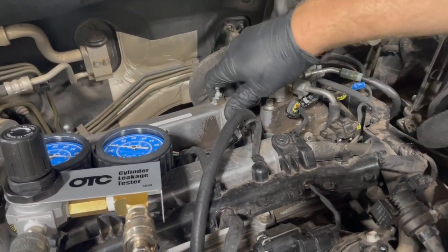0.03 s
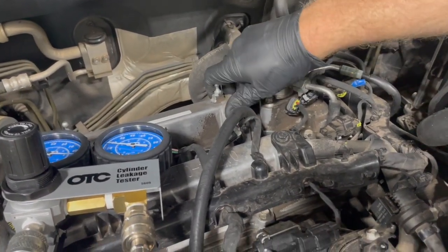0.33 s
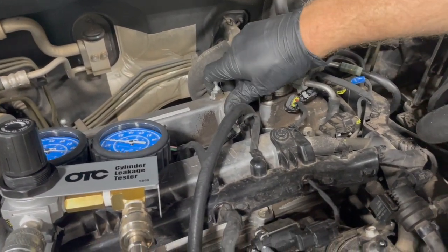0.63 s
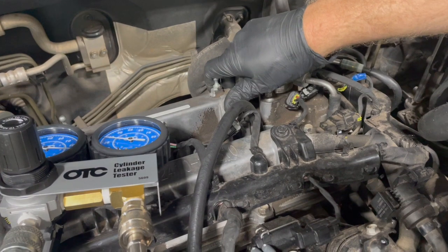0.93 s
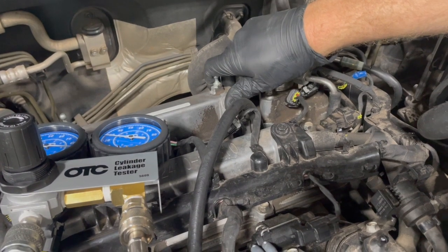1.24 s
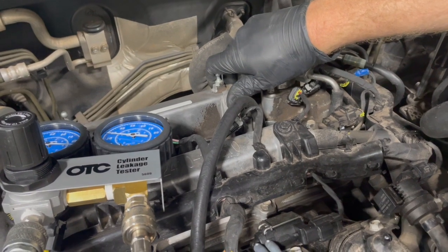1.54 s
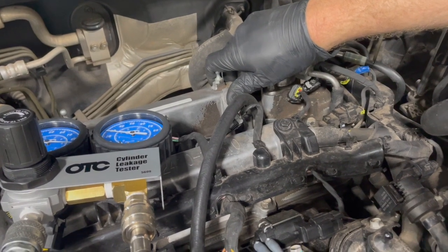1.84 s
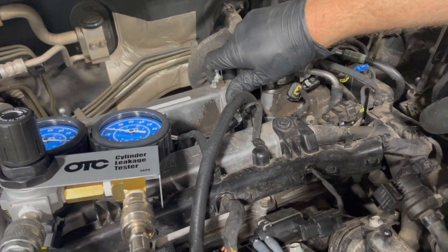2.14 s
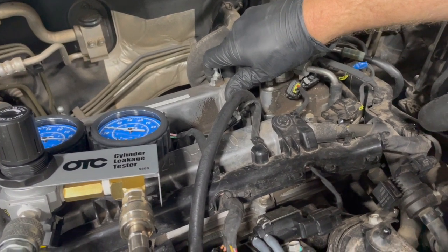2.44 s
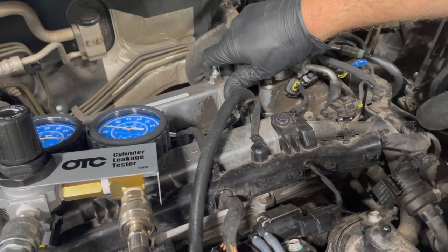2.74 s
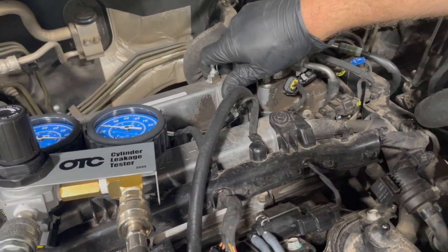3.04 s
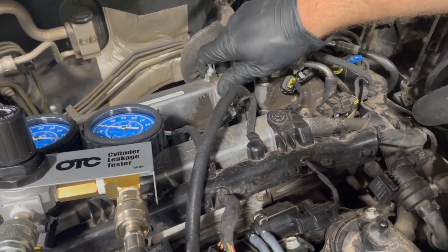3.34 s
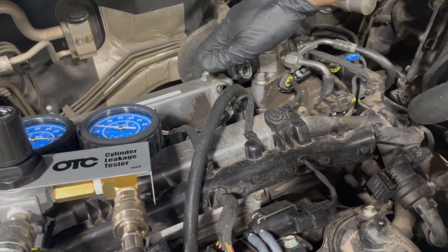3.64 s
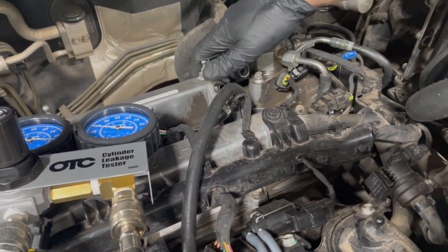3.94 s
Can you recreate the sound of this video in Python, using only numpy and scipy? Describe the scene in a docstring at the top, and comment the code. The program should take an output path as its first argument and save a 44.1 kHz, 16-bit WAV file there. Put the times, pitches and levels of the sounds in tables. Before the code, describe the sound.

Compressed air hisses thinly, then bursts out loudly as a hose is uncoupled.

```python
"""A thin, steady hiss of compressed air leaks from a tester on a car engine, over a garage's rumble and hum.
A gloved hand rubs softly as it takes hold, and late in the scene it uncouples the hose: the seal cracks,
the trapped air bursts out, rings the cavities of the engine bay and dies away in the room.
The loose hose knocks dully, and air keeps venting from the open fitting as the pressure sinks.
The air is shaped stereo noise; the knocks are damped sines that sag in pitch."""
import sys
import numpy as np
from scipy import signal
from scipy.fft import rfft, irfft
from scipy.io import wavfile

SR = 44100
rng = np.random.default_rng(int(sys.argv[2]) if len(sys.argv) > 2 else 0)


def generate_wav(sig):
    """Save sig (samples, or channels by samples) to the path in sys.argv[1] as 16-bit PCM at SR."""
    pcm = np.round(np.clip(np.atleast_2d(sig).T, -1, 1) * 32767).astype(np.int16)
    wavfile.write(sys.argv[1], SR, pcm)


N = 176400
T, HZ = np.arange(N) / SR, np.fft.rfftfreq(N, 1 / SR)
RELEASE_S = 3.354  # the hose comes off

# Colour of the escaping trapped air. Each row: frequency in Hz, relative level in dB.
BURST_SPECTRUM = [(520, -16), (690, -9.5), (950, -17.5), (1030, -9), (1380, -8), (1640, -1), (1810, -7),
                  (2670, -6.5), (3360, 2.4), (3960, -4.5), (4220, -6), (4740, -8.5), (5430, -6),
                  (5770, -3.5), (5940, -3), (6370, -12.5), (7150, -1), (7410, -21), (8700, -6.5),
                  (13610, -15.5), (14470, -17), (15590, -28)]


def amp(db):
    """Decibels to gain."""
    return 10 ** (np.asarray(db) / 20)


def unit(x):
    """Scales to rms 1."""
    return x / np.sqrt(np.mean(x ** 2) + 1e-20)


def curve(points, hz, column=1):
    """One column of a table, interpolated along log frequency."""
    columns = np.transpose(points)
    return np.interp(np.log(hz + 1), np.log(columns[0] + 1), columns[column])


def wander(size, span):
    """A smooth random drift of rms 1 that changes over about span steps."""
    smoothing = np.exp(-(np.fft.rfftfreq(size) * span * 2) ** 2)
    return unit(irfft(rfft(rng.standard_normal(size)) * smoothing, size))


def above(hz):
    """Gain of a gentle high-pass."""
    return HZ ** 2 / np.sqrt(HZ ** 4 + hz ** 4)


def band(hz, width_hz):
    """Gain of a steep resonance."""
    return 1 / (1 + ((HZ - hz) / width_hz) ** 2 * 2)


def ripple(depth_db, spacing_hz):
    """Uneven colour from reflections off nearby engine parts."""
    return amp(depth_db * wander(len(HZ), spacing_hz * N / SR))


def flutter(depth_db, span_s):
    """The wavering gain of an unsteady flow."""
    return amp(depth_db * wander(N, span_s * SR))


def noise(gain):
    """Stereo turbulence of rms 1, coloured by gain, as a microphone pair hears it."""
    # Stereo image, lows then treble. Each row: frequency in Hz, coherence 0-1, left's lead in half turns.
    image_low = [(50, 1, 0), (300, 0.78, 0.33), (905, 0.56, 0.3), (1600, 0.62, 0.26), (2300, 0.79, 0.16),
                 (3030, 0.99, 0.57), (4000, 0.5, 0.12), (4980, 1, 0.15), (5770, .35, 0.41), (6200, 0.35, 1)]
    image_high = [(6950, 1, 1), (7900, 1, 1), (8250, .85, .87), (8800, .6, .5), (9700, .9, .05),
                  (10400, 1, 0), (12200, 1, 0), (13000, .55, -.45), (13500, 1, -1)]
    # Lean to the left. Each row: frequency in Hz, left minus right in dB.
    balance = [(200, 0), (750, 2.5), (1600, 2), (3000, 4), (4600, 1), (5800, 6), (6900, 3.5)]
    image = image_low + image_high
    left, other = rng.standard_normal((2, len(HZ))) + 1j * rng.standard_normal((2, len(HZ)))
    coherence = np.clip(curve(image, HZ), 0, 1)
    lag = np.exp(-1j * np.pi * curve(image, HZ, column=2))
    right = (coherence * left + np.sqrt(1 - coherence ** 2) * other) * lag
    lean = amp(curve(balance, HZ) * (HZ < 6850) / 2)  # the top is equally loud on both sides
    panned = np.array([left * lean, right / lean]) / np.hypot(lean, 1 / lean)
    return unit(irfft(panned * gain, N))


def shifting_jet(gain, depth_db, spacing_hz, count):
    """Turbulence whose reflections shift as the hand moves: a slow crossfade through count colours."""
    place = T / T[-1] * (count - 1)
    fades = (np.cos(np.pi / 2 * np.clip(place - k, -1, 1)) for k in range(count))
    return sum(fade * noise(gain * ripple(depth_db, spacing_hz)) for fade in fades)


def swell(peak_s, length_s, db, hz, width_hz):
    """A band of noise that fades in and out on a bell curve."""
    return amp(db) * np.exp(-(2 * (T - peak_s) / length_s) ** 2) * noise(band(hz, width_hz))


def garage():
    """The bed: low rumble, and a shop machine's wavering hum on multiples of its shaft rate."""
    # Colour of the rumble. Each row: frequency in Hz, relative level in dB.
    spectrum = [(15, -15), (35, -10.5), (57, 3), (85, -7.5), (110, -2.5), (150, -9), (250, -13),
                (400, -16.5), (600, -27.5), (1000, -35.5), (2500, -46)]
    # Machine hum. Each row: multiple of the shaft rate, level in dB.
    harmonics = [(2, -55.5), (3, -50), (4, -59), (5, -62.5), (6, -72)]
    shaft_hz = 35.94
    rumble = amp(-47.5) * noise(amp(curve(spectrum, HZ))) * flutter(depth_db=1.34, span_s=0.2)
    hum = sum(amp(db) * noise(band(k * shaft_hz, width_hz=2.9)) for k, db in harmonics)
    return rumble + hum


def glove_rubs():
    """The glove rubs softly on the hose as the hand takes hold."""
    # Each row: peak time in seconds, length in seconds, level in dB, centre in Hz, width in Hz.
    rubs = [(.035, 0.14, -48, 473, 26.1), (.24, 0.22, -57.5, 1550, 129), (0.224, 0.47, -55, 343, 203.7)]
    return sum(swell(*rub) for rub in rubs)


def leak_moans():
    """Faint hollow notes come and go in the leaking air."""
    # Each row: peak time in seconds, length in seconds, level in dB, pitch in Hz, width in Hz.
    moans = [(1.55, 0.66, -63, 888, 11), (2.9, 2.8, -66.5, 950, 47), (2.9, 1.3, -62.5, 693, 100)]
    return sum(swell(*moan) for moan in moans)


def leak():
    """A thin, bright jet that creeps up in level, then dies as the hose comes off."""
    # Colour of the narrow leak. Each row: frequency in Hz, relative level in dB.
    spectrum = [(600, -11.5), (690, -7), (760, -13.5), (940, -5), (1110, -17), (1290, -10), (1780, -18),
                (2020, -7.5), (2330, -9.5), (3010, -13), (3190, -11), (3700, -8), (3960, -12),
                (4570, -10.5), (5400, -8.5), (6200, -6.5), (6550, 3.5), (6850, -8.5), (7400, 2),
                (7850, -18), (8130, 2.5), (8900, -5.5), (10000, -2), (10900, -3.5), (12000, -4),
                (13700, -6.5), (15000, -3), (15590, -5)]
    level_db, growth_db_per_s, fade_s = -42.5, 0.51, 0.26
    jet = shifting_jet(amp(curve(spectrum, HZ)) * above(440), depth_db=3.5, spacing_hz=52.7, count=4)
    pressure = np.clip(1 - (T - RELEASE_S) / fade_s, 0, 1)
    return jet * pressure * amp(level_db + growth_db_per_s * T) * flutter(depth_db=0.47, span_s=0.049)


def fitting_note():
    """A hollow note swells in the open fitting as the flow slows."""
    return swell(peak_s=3.92, length_s=0.35, db=-44, hz=4270, width_hz=530)


def vent():
    """Air keeps running out of the open fitting, fading as the pressure sinks."""
    # Colour of the open fitting. Each row: frequency in Hz, relative level in dB.
    spectrum = [(260, -6), (500, -4.5), (690, 4), (1000, -5), (1300, 0), (1580, -5), (2130, -20),
                (2330, -6), (2600, -26), (3300, -4.5), (4550, -1), (5150, -10.5), (6400, -7.5), (7700, -17),
                (8100, 6), (8550, -1), (9200, -14.5), (10000, -6), (11100, -5), (11800, -11), (12700, -8),
                (13500, -21), (14500, -8), (15590, -20)]
    start_s, rise_s, fade_db_per_s = 3.559, 0.18, 22
    jet = shifting_jet(amp(curve(spectrum, HZ)) * above(240), depth_db=3.5, spacing_hz=30, count=5)
    age = np.maximum(T - start_s, 0)
    envelope = np.minimum(age / rise_s, 1) * amp(-28 - fade_db_per_s * age)
    return jet * envelope * flutter(depth_db=0.5, span_s=0.03)


def hose_knocks():
    """Rubbery thuds of hose and fitting: each a damped swing whose pitch sags, with a dull scuff."""
    # Each row: start in seconds, level in dB, settled pitch in Hz, fraction by which it starts
    # sharp, seconds to fall 60 dB.
    knocks = [(3.363, -19.5, 114, 0.2, 0.042), (3.420, -9, 172, 0.51, 0.011),
              (3.427, -18.5, 286, 0.067, 0.012), (3.430, -12, 58.3, 1, .16),
              (3.581, -14.5, 132.5, 0.46, 0.055), (3.589, -21, 89.5, 0.36, 0.056),
              (3.629, -29.5, 99, 0.28, 0.067), (3.873, -32.5, 96, 0.13, 0.076)]
    rise_s, sag_s, scuff_db, scuff_t60_s = 0.0017, 0.012, -5.5, 0.04
    out, t = np.zeros(N), np.arange(SR // 3) / SR
    lowpass = signal.butter(4, 444, fs=SR, output="sos")
    for start, db, hz, sharp, t60 in knocks:
        turns = np.cumsum(hz * (1 + sharp * np.exp(-t / sag_s))) / SR
        swing = np.sin(2 * np.pi * turns) * amp(-60 * t / t60)
        dull_noise = unit(signal.sosfilt(lowpass, rng.standard_normal(len(t))))
        scuff = dull_noise * amp(scuff_db - 60 * t / scuff_t60_s)
        thud = amp(db) * np.minimum(t / rise_s, 1) * (swing + scuff)
        slot = out[round(start * SR):][:len(t)]
        slot += thud[:len(slot)]
    return out


def seal_crack():
    """A short, bright snap of air as the seal lets go."""
    start_s, rise_s, fade_db_per_s = 3.351, 0.0013, 700
    age = np.maximum(T - start_s, 0)
    envelope = np.minimum(age / rise_s, 1) * amp(-17.5 - fade_db_per_s * age)
    return envelope * noise(amp(curve(BURST_SPECTRUM, HZ)) * above(500))


def burst():
    """The hose empties in one blast that rings the engine bay and leaves a darkening tail in the room."""
    # Cavities of the engine bay. Each row: resonance in Hz, width in Hz, boost in dB.
    cavities = [(705, 67, 6.5), (1627, 36, 3), (1952, 22, 8), (2290, 18, 11.5), (2520, 20, 5.5),
                (3020, 33, 3), (2930, 28, 5), (3370, 25, 3), (3420, 32, 3), (4160, 46, 7), (4540, 62, 5.5),
                (5290, 39, 8.5), (6030, 25, 8.5), (9598, 20, 2)]
    # Decay of the tail. Each row: frequency in Hz, seconds to fall 60 dB.
    tail_t60 = [(300, 2.7), (800, 1.63), (1600, 1.98), (3300, 1.23), (6000, 0.97), (10000, 1),
                (15000, 0.88)]
    opening_db_per_s, emptying_db_per_s, tail_db = 1421, 296, -5.5
    boost_db = sum(db * band(hz, width) for hz, width, db in cavities)
    colour = amp(curve(BURST_SPECTRUM, HZ) + boost_db) * above(346)
    jet = noise(colour * ripple(depth_db=1.5, spacing_hz=25.6))
    hz, t, bands = signal.stft(jet, SR, nperseg=256)  # each band dies at its own rate
    age = np.maximum(t - RELEASE_S, 0)
    blast = amp(-emptying_db_per_s * age)
    tail = amp(tail_db - 60 * age / curve(tail_t60, hz)[:, None])
    dying_jet = signal.istft(bands * np.hypot(blast, tail), SR, nperseg=256)[1][:, :N]
    opening = amp(opening_db_per_s * np.clip(T - RELEASE_S, -0.2, 0))
    return amp(-12) * opening * dying_jet * flutter(depth_db=1.6, span_s=0.0067)


def scene():
    """The air, the handling of the hose and the garage, mixed in stereo."""
    air = leak() + leak_moans() + seal_crack() + burst() + vent() + fitting_note()
    return air + hose_knocks() + glove_rubs() + garage()


def record(dry):
    """A soft limiter rounds the loudest peaks, then a steep low-pass trims the very top."""
    ceiling, cutoff_hz = 0.8, 15750
    limited = dry / (1 + (dry / ceiling) ** 8) ** (1 / 8)
    lowpass = signal.firwin(511, cutoff_hz, window=("kaiser", 9), fs=SR)
    return signal.oaconvolve(limited, lowpass[None], "same")


dry = scene()
out = record(dry)
generate_wav(out)
```